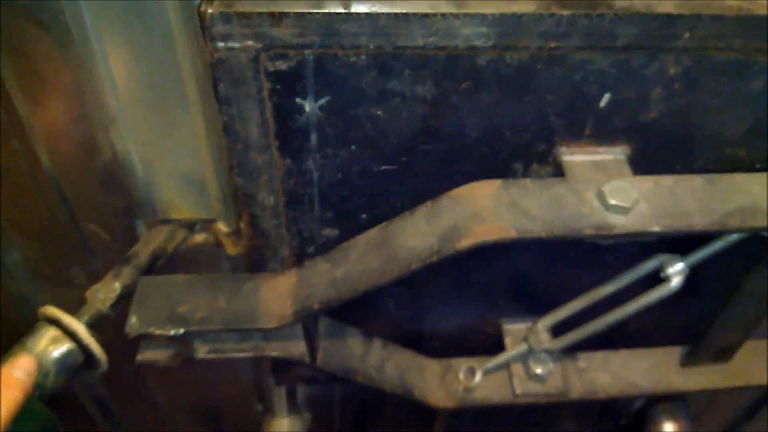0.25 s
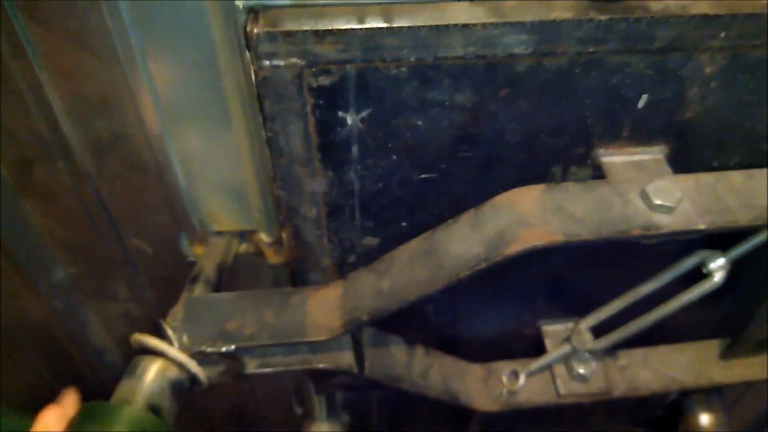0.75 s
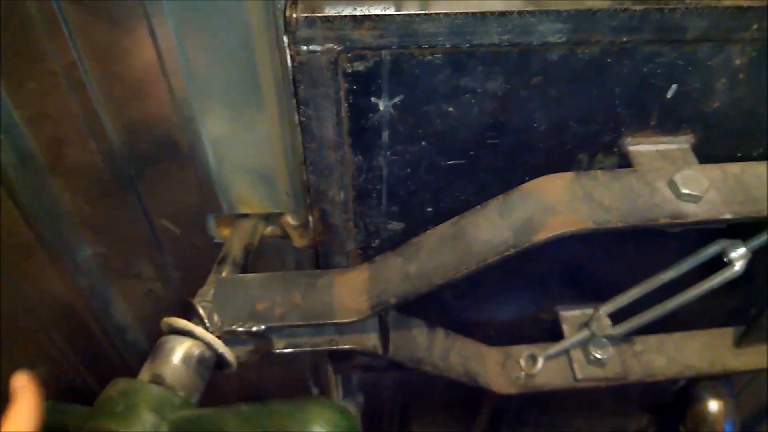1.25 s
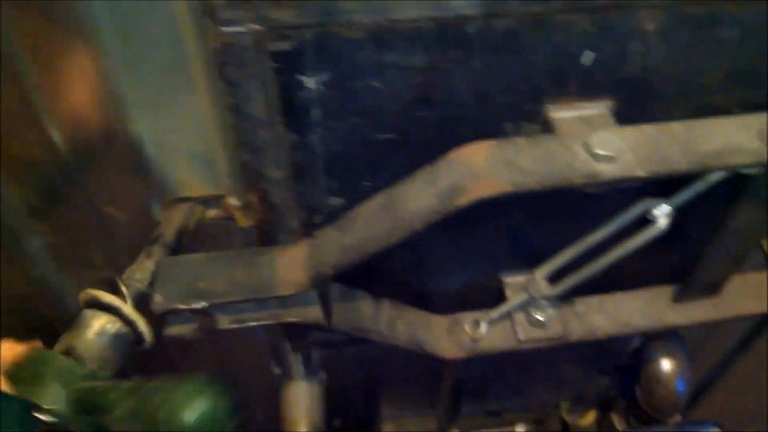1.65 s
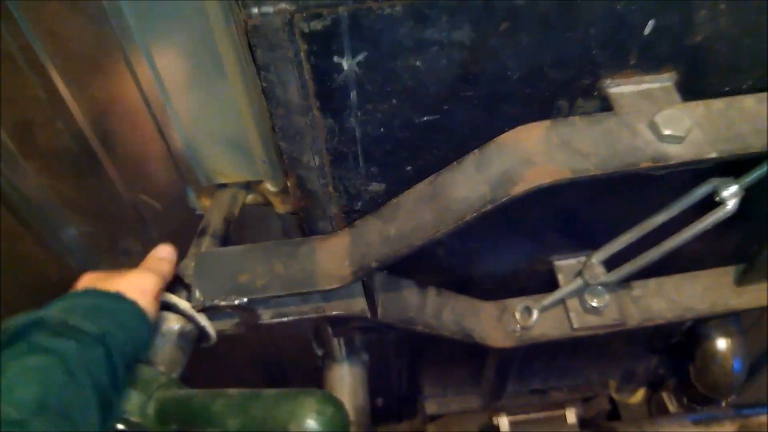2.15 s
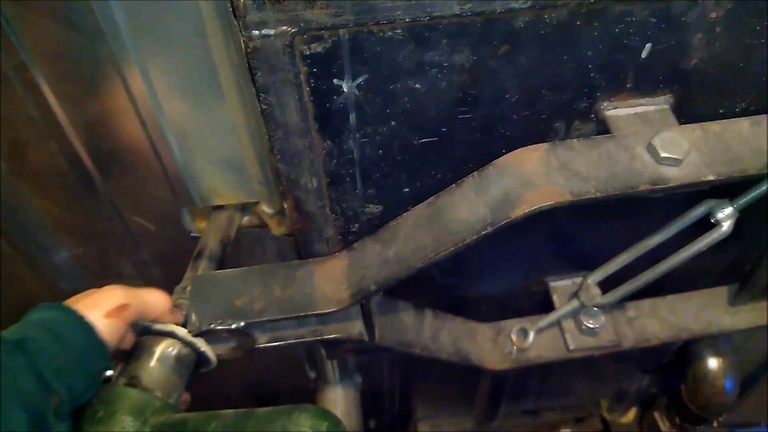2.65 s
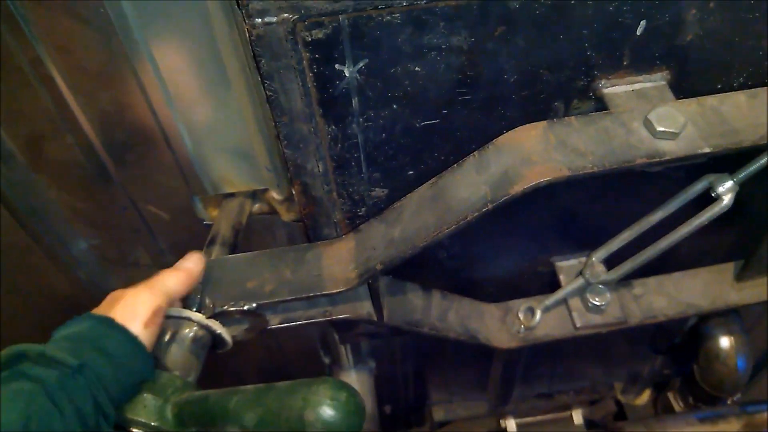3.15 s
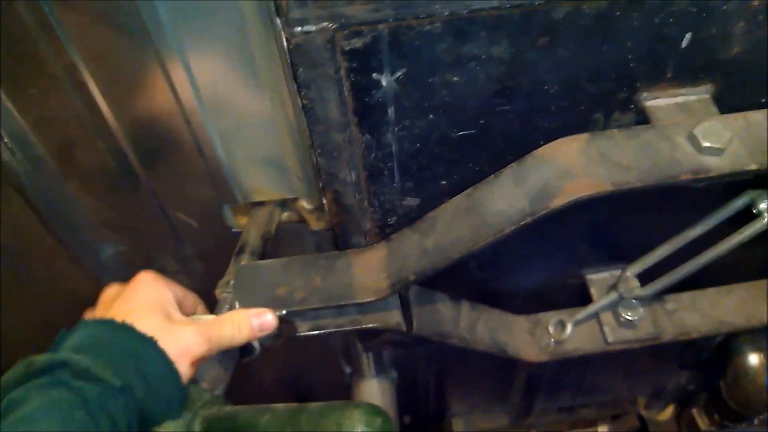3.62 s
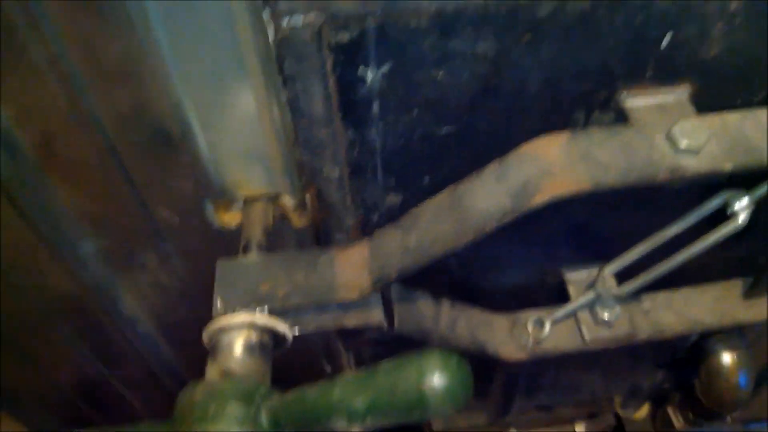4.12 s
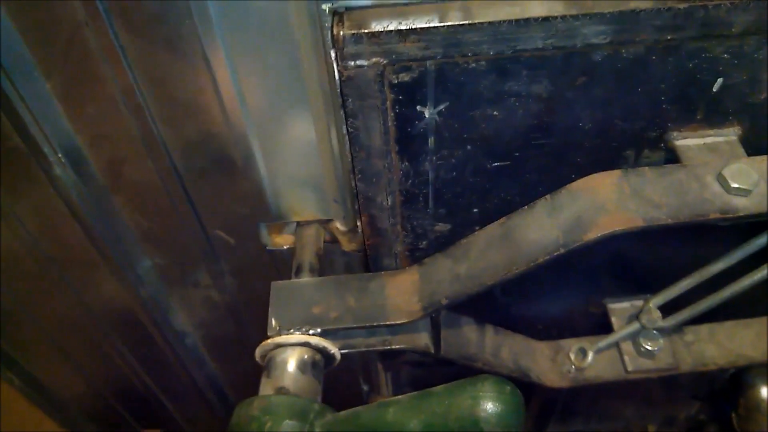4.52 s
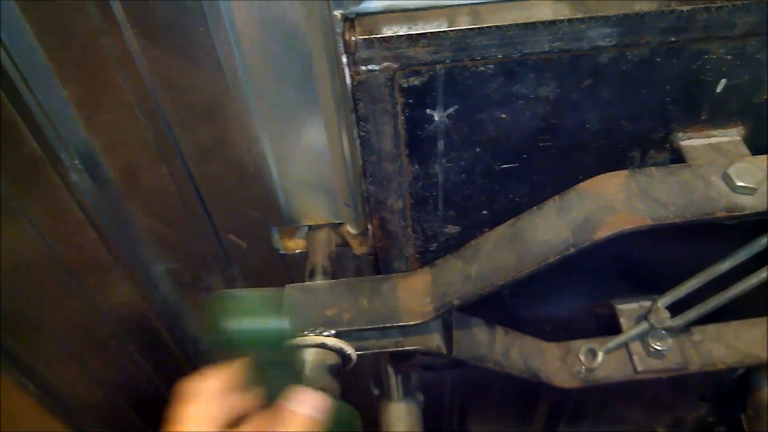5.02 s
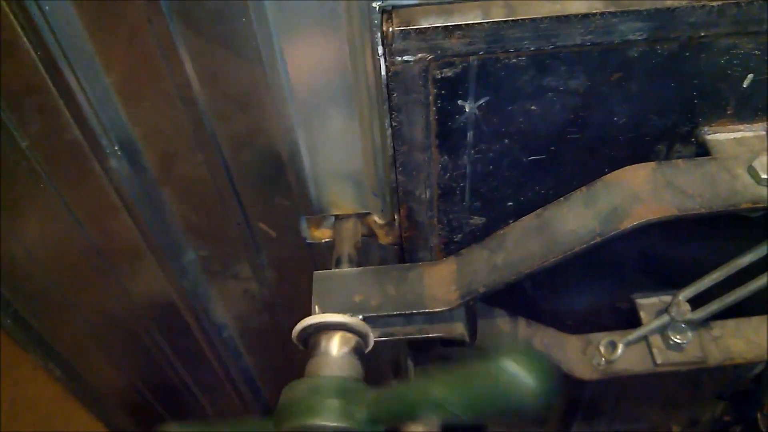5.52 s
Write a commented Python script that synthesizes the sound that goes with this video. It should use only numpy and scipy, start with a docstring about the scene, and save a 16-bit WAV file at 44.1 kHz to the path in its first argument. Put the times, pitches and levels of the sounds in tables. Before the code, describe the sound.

A heavy steel door and its latch linkage clank, scrape and rattle up close as they are shut and clamped.

```python
"""A steel door is pushed shut and its screw latch swung into the fork and tightened, close to the microphone.
Blows make the panel boom and the frame clang, and both shudder on. The linkage scrapes as it slides,
steel clicks on steel, and a loose washer and other latch parts ring when struck.
The place is a quiet workshop, heard in stereo: short reflections, a faint hum behind."""
import sys
import numpy as np
from scipy import signal
from scipy.fft import rfft, irfft
from scipy.io import wavfile
from scipy.ndimage import uniform_filter1d

SR = 44100
rng = np.random.default_rng(int(sys.argv[2]) if len(sys.argv) > 2 else 0)


def materialize(psi):
    """Save the field psi as 16-bit PCM at rate SR to the path in sys.argv[1].

    A 1-D psi becomes a single channel; in a 2-D psi each row is a channel.
    """
    bounded = np.clip(np.atleast_2d(psi).T, -1, 1)
    quanta = np.round(bounded * 32767).astype(np.int16)
    wavfile.write(sys.argv[1], SR, quanta)


N = 254589
TIME, HZ = np.arange(N) / SR, np.fft.rfftfreq(N, 1 / SR)
RING_TIME = np.arange(SR // 5) / SR

def amp(db):
    return 10 ** (np.asarray(db) / 20)

def decay(t, t60):
    return amp(-60 * t / t60)

def unit_rms(x):
    return x / np.sqrt(np.mean(x ** 2) + 1e-20)

def curve(points, hz=HZ):
    f, value = np.transpose(points)
    return np.interp(np.log(hz + 1), np.log(f + 1), value)

def add(mix, s, sound):
    part = mix[..., round(s * SR):][..., :sound.shape[-1]]
    part += sound[..., :part.shape[-1]]

def colour(x, db):
    return irfft(rfft(x) * amp(db), x.shape[-1])

def highpass(x, hz):
    return signal.sosfilt(signal.butter(2, hz, "high", fs=SR, output="sos"), x)

def convolve(x, response):
    return signal.oaconvolve(x, np.atleast_2d(response), axes=1)[:, :N]

def pan(left_db):
    gains = amp([[left_db / 2], [-left_db / 2]])
    return 2 * gains / np.linalg.norm(gains)

def ring(modes, t60_scale=1, tilt_db=0, uneven_db=0):
    """One tap: dying sines of alternate sign, tilted and uneven by where it lands."""
    hz, db, t60 = np.transpose(modes)[..., None]
    db = db + tilt_db * np.log2(hz / 1300) + uneven_db * rng.standard_normal(hz.shape)
    sines = amp(db) * decay(RING_TIME, t60 * t60_scale) * np.sin(2 * np.pi * hz * RING_TIME)
    return (-1.) ** np.arange(len(hz)) @ sines

def favoured(modes, spot_hz, db_per_octave=16):
    """Modes far from the pitch that the struck spot favours are weaker."""
    return [(hz, db - db_per_octave * abs(np.log2(hz / spot_hz)), t60) for hz, db, t60 in modes]

def slips(per_s, spread_db):
    """Two trains of tiny slips of uneven size."""
    size = amp(spread_db * np.minimum(rng.exponential(1, (2, N)), 4)) * rng.standard_normal((2, N))
    return size * (rng.random((2, N)) < per_s / SR)

def swells(starts, lengths, levels_db, rise_s, fall_t60):
    """Envelopes that rise, hold and die, summed in power."""
    grid = np.arange(0, N / SR + .004, .002)
    t = grid - starts[:, None]
    release = decay(np.maximum(t - np.reshape(lengths, (-1, 1)), 0), fall_t60)
    shapes = amp(levels_db[:, None]) * np.clip(t / rise_s, 0, 1) * release
    return np.interp(TIME, grid, np.linalg.norm(shapes, axis=0))

# Likeness of the microphone's two sides: f/Hz, correlation
LIKENESS = [(60, 0.89), (180, 0.99), (550, 0.79), (1200, 0.24), (5000, -0.25), (15000, 0.28)]
# Their balance: f/Hz, left over right/dB
BALANCE = [(60, 0.6), (500, -0.1), (1500, 3.5), (4000, 3.5), (9000, -8.5), (15000, -4.5)]
def stereo(pair):
    """The two sides hear partly the same sound, leaning left or right by pitch."""
    left, unlike = rfft(pair)
    same = curve(LIKENESS)
    right = same * left + np.sqrt(1 - same ** 2) * unlike
    return irfft(np.array([left, right]) * amp(np.outer([.5, -.5], curve(BALANCE))), N)

# Workshop air: f/Hz, relative level/dB
AIR = [(59, -24), (100, -3.5), (1380, -22.5), (2150, -18.5), (3520, -40), (3830, -27), (10200, -25),
       (15300, -52), (16300, -26)]
def hum():
    """Steady air far behind, with the microphone's hiss."""
    return amp(-62) * unit_rms(stereo(colour(rng.standard_normal((2, N)), curve(AIR))))

# Course of the rumble: t/s, level/dB
RUMBLE = [(0.0, -47.5), (0.06, -54), (0.39, -61.5), (0.51, -55), (0.63, -56), (1.64, -59.5), (1.89, -57),
          (2.28, -58), (2.71, -64), (2.92, -64), (3.66, -56), (3.76, -44), (3.92, -62), (4.02, -38.5),
          (4.36, -62.5), (4.93, -52.5), (5.0, -58), (5.77, -53.5)]
# Its spectrum: f/Hz, relative level/dB
RUMBLE_TONE = [(20, -39), (35, -11.5), (55, -1), (78, 5.5), (100, 2), (130, -28.5)]
def rumble():
    """Low noise swells up to the microphone through floor and hand."""
    noise = colour(rng.standard_normal((2, N)), curve(RUMBLE_TONE))
    return amp(np.interp(TIME, *np.transpose(RUMBLE))) * unit_rms(stereo(noise))

def room(x):
    """The workshop walls return sparse, dulled reflections after 4 ms."""
    t = np.arange(SR // 2) / SR
    echoes = rng.choice([-1., 1.], (2, len(t))) * (rng.random((2, len(t))) < .05) * (t > .004)
    tail = signal.lfilter([1], [1, -.5], echoes * decay(t, t60=.18))
    return convolve(x, tail / np.linalg.norm(tail[0]))

# Linkage strokes: t/s, length/s, scrape level/dB, panel level/dB, frame level/dB
STROKES = [(0, 0.11, -62.5, -60.5, -75), (0.225, 0.36, -91, -67, -77), (0.5, 0.025, -35, -34, -46),
           (0.703, 0.15, -45, -64, -45.5), (0.896, 0.18, -54.5, -49, -58),
           (1.17, 0.41, -65.5, -68.5, -71.5), (1.51, 0.38, -79, -49.5, -63.5),
           (1.81, 0.018, -24.5, -22.5, -54), (1.885, 0.2, -46.5, -53.5, -43.5),
           (2.095, 0.21, -54.5, -49, -52), (2.378, 0.19, -52, -48, -49),
           (2.599, 0.053, -43.5, -46.5, -42.5), (2.673, 0.16, -57.5, -48, -51.5),
           (3.038, 0.38, -92, -55.5, -77), (3.636, 0.19, -68.5, -52, -66), (3.742, 0.068, -50, -61, -61),
           (3.91, 0.083, -42, -45.5, -44), (3.99, 0.21, -44, -58.5, -48), (4.358, 0.25, -85, -80, -78),
           (4.6, 0.41, -73.5, -62, -70), (4.94, 0.11, -62.5, -49.5, -58), (5.09, 0.028, -59, -43, -58),
           (5.453, 0.21, -55, -52.5, -58), (5.55, .2, -78, -67, -82)]
def sliding(part):
    """How hard the moving linkage drives one part."""
    starts, lengths, *levels = np.transpose(STROKES)
    db = levels[["scrape", "panel", "frame"].index(part)]
    return swells(starts, lengths, db, rise_s=.031, fall_t60=.3)

# Steel rubbing on steel: f/Hz, relative level/dB
GRIT = [(120, -72), (500, -18.5), (1180, -20), (2000, 1), (2160, -8), (2970, -4.5), (3210, -1.5),
        (6720, -3.5), (10200, -3), (12400, -10.5), (14400, -17.5), (16300, -28.5)]
def scrape():
    """Dense grit under the sliding linkage."""
    grit = colour(slips(per_s=2500, spread_db=2.5), curve(GRIT))
    return sliding("scrape") * unit_rms(stereo(grit))

# Dry steel contacts: t/s, level/dB, tilt/(dB per octave), t60/s
CLICKS = [(0.094, -51.5, 7, 0.058), (0.134, -50, 15, 0.035), (.248, -55, 11, 0.057), (0.451, -49, 1, 0.033),
          (0.4906, -30.5, 2, 0.038), (0.4968, -23, 7, 0.031), (0.4991, -19.5, -8.5, 0.042),
          (0.5152, -31, -11, 0.04), (0.529, -22.5, 4.5, 0.051), (0.5463, -34.5, -8, 0.092),
          (0.708, -32, 6, 0.086), (0.735, -35.5, 11, 0.14), (0.7823, -30, -6, 0.038),
          (0.795, -22.5, 5, 0.027), (0.8005, -21.5, -14, 0.0069), (0.87, -27, 1, 0.024),
          (0.992, -44.5, 14, 0.14), (1.0504, -46.5, 15, 0.059), (1.074, -38.5, 0.5, 0.043),
          (1.239, -54.5, 7.5, 0.12), (1.26, -40.5, 11, 0.054), (1.4408, -33, 3, 0.014),
          (1.507, -43.5, 6, 0.021), (1.586, -50.5, 9, 0.054), (1.7392, -46, -8, 0.033),
          (1.787, -49, 3, 0.036), (1.8052, -33.5, -16, 0.058), (1.8207, -36, -4, 0.055),
          (1.8327, -18.5, 3, 0.079), (1.8434, -21.5, 8, 0.033), (1.8621, -25, -12, 0.04),
          (1.878, -21.5, 3.5, 0.054), (1.9602, -38.5, -1, 0.066), (1.9962, -28.5, -6, 0.02),
          (2.0621, -28, 2, 0.022), (2.201, -43, -4, 0.036), (2.272, -34.5, -5.5, 0.017),
          (2.28, -36, -2, 0.029), (2.2948, -34.5, -3, 0.019), (2.3416, -35, -7, 0.028),
          (2.35, -30.5, 1, .03), (2.384, -46, 19, .02), (2.4135, -26, 1.5, 0.022), (2.485, -36, -12, 0.039),
          (2.501, -24, 5, 0.018), (2.562, -35, 1, 0.026), (2.599, -37.5, -3, 0.14),
          (2.6733, -28.5, 12, 0.073), (2.6781, -28.5, -10, 0.031), (2.709, -26, -13, 0.017),
          (2.788, -46.5, 8, 0.041), (2.824, -42.5, -7.5, 0.029), (2.8585, -46, 12, 0.09),
          (3.8834, -16.5, 4, 0.014), (4, -36, 2, 0.059), (4.035, -31.5, -1, 0.04),
          (4.05, -32.5, -0.5, 0.032), (4.086, -21.5, 11.5, 0.015), (4.113, -24, 10.5, 0.058),
          (4.205, -28, 3, 0.024), (4.2905, -32, -21.5, 0.013), (4.299, -44.5, -7, 0.034),
          (4.392, -43, 23, 0.021), (4.4518, -54.5, 11, .03), (4.5344, -43.5, 14, 0.041),
          (4.568, -39.5, 21, 0.042), (4.981, -45.5, 3, 0.041), (4.994, -47.5, 7, 0.036),
          (5.129, -32, -0.5, 0.04), (5.141, -29.5, 13.5, 0.05), (5.4673, -38, 13.5, 0.058)]
def clicks():
    """Noise bursts with chance resonances, each opened by a crack; brighter ones lie further right."""
    out, t, hz = np.zeros((2, N)), np.arange(8192) / SR, np.fft.rfftfreq(8192, 1 / SR)
    crack_time = t - .0011
    crack = amp(-2) * decay(crack_time, t60=.013) * np.clip(crack_time / .0026, 0, 1)
    for s, db, tilt_db, t60 in CLICKS:
        lumps = unit_rms(uniform_filter1d(uniform_filter1d(rng.standard_normal(len(hz)), 60), 60))
        tone_db = curve(GRIT, hz) + tilt_db * np.log2(hz / 7000 + .11) + 3.5 * np.clip(lumps, -2, 1.5)
        burst = unit_rms(colour(rng.standard_normal((2, len(t))), tone_db))
        body = decay(t, t60) * np.minimum(t / .0048, 1)
        add(out, s, amp(db) * pan(-6 - .54 * tilt_db) * burst * (body + crack))
    return out

def clinks(hits, modes, t60_scale, left_db):
    """A tapped part rings freely until the next contact catches it."""
    out = np.zeros((2, N))
    for s, db, free_s, *spot_hz in hits:
        struck = favoured(modes, *spot_hz, db_per_octave=17) if spot_hz else modes
        envelope = np.minimum(RING_TIME / .00025, 1) * decay(np.maximum(RING_TIME - free_s, 0), t60=.02)
        sound = ring(struck, t60_scale, uneven_db=2.5) * envelope
        late = np.roll(sound, rng.integers(1, 6))  # reaches the left side a little later
        add(out, s, amp(db) * pan(left_db) * np.array([late, sound]) / abs(sound).max())
    return out

# Taps on each part: t/s, level/dB, free ringing/s, favoured f/Hz
WASHER_HITS = [(.494, -12, 0.0052, 10400), (.497, -17.5, 0.0073, 10400), (.5, -8.5, 0.0025, 10400),
               (.506, -25, 0.003, 10400), (.522, -39, 0.057, 10800), (.59, -58, 0.035, 10800),
               (.87, -26, 0.0046, 10500), (2.061, -22.5, 0.055, 9850), (2.083, -20.5, 0.01, 10100),
               (2.1, -25.5, 0.034, 10200), (2.195, -40.5, 0.033, 8300), (2.24, -42.5, 0.047, 10300),
               (2.27, -24.5, 0.0031, 10300), (2.282, -27.5, 0.013, 10300), (2.296, -31.5, 0.038, 9600),
               (2.343, -30, 0.0054, 10600), (2.352, -33.5, 0.0093, 10600), (2.415, -24.5, 0.0037, 9100),
               (2.486, -25.5, 0.0072, 8200), (2.503, -31, 0.074, 8500), (2.565, -35, 0.021, 10600),
               (2.598, -25.5, 0.054, 9300), (2.71, -35.5, 0.029, 10200), (5.136, -32, 0.025, 10520)]
PIN_HITS = [(.001, -35, 0.11, 10000), (1.443, -25, 0.05, 7300), (1.51, -39.5, 0.034, 7500)]
BAR_HITS = [(.864, -29, 0.11, 1580), (2.338, -39, 0.098, 1740), (2.41, -41.5, 0.096, 1750),
            (2.49, -46, 0.041, 1740), (2.595, -38, 0.07, 1830), (2.671, -24, 0.05, 1480),
            (2.704, -23.5, 0.019, 1480), (2.855, -40.5, 0.075, 1430), (4.2, -39, 0.027, 1960)]
# Their modes: f/Hz, level/dB, unscaled t60/s
WASHER_MODES = [(3990, 1, .08), (5240, -5, .05), (7456, -18, .06), (8113, -8, .07), (10390, 0, .14),
                (10450, -11, .12), (14540, -10, .11)]
PIN_MODES = [(4800, 2, .025), (6420, -7, .03), (6705, 3, .035), (7905, -4, .11), (9200, -8, .08),
             (9520, 0, .1), (12940, 2, .055), (14950, -6, .04)]
BAR_MODES = [(414, 3, .25), (891, 0, .17), (1300, -9, .09), (1744, 0, .16), (2045, -5, .09),
             (2299, -1, .15), (2690, -5, .07)]
def latch_clinks():
    """The loose washer and the pin ring high on the right, the bar lower near the centre."""
    return (clinks(WASHER_HITS, WASHER_MODES, t60_scale=1.6, left_db=-20)
            + clinks(PIN_HITS, PIN_MODES, t60_scale=1, left_db=-12)
            + clinks(BAR_HITS, BAR_MODES, t60_scale=.95, left_db=1.5))

# Taps on each part: t/s, level/dB, free ringing/s
LINK_HITS = [(.797, -20.5, .007), (2.344, -27, .007), (2.352, -31, .01), (2.415, -50, .005),
             (2.503, -29.5, 0.0046), (2.612, -30, .02), (2.709, -21, 0.01)]
FORK_HITS = [(2.676, -16.5, 0.006), (2.682, -17, 0.003), (2.709, -22, 0.0096), (2.862, -39.5, 0.022),
             (5.475, -63, 0.14)]
HANDLE_HITS = [(4.088, -42, .015), (4.115, -11, 0.11), (4.57, -50, 0.079), (4.99, -49, .02)]
HUB_HITS = [(4.028, -30.5, .03), (4.972, -35, .1), (5.119, -33.5, 0.013), (5.137, -31, .1)]
# Their modes: f/Hz, level/dB, unscaled t60/s
LINK_MODES = [(4920, -6, .02), (5320, 0, .025), (5850, -6, .02), (7350, -7, .02)]
FORK_MODES = [(8700, -1, .035), (9877, 0, .045)]
HANDLE_MODES = [(6072, -19, .07), (8120, -14, .14), (10410, -12, .1), (11625, 0, .055), (12280, -8, .08),
                (13490, -9, .09), (14540, -15, .08)]
HUB_MODES = [(754, -3, .13), (829, 0, .08), (895, -3, .1), (1030, -6, .1), (1734, -7, .09), (2013, -1, .06)]
def fastening_clinks():
    """A link snaps over, fork and screw handle ring on the right; the hub knocks near the centre."""
    return (clinks(LINK_HITS, LINK_MODES, t60_scale=.95, left_db=-9)
            + clinks(FORK_HITS, FORK_MODES, t60_scale=.8, left_db=-17)
            + clinks(HANDLE_HITS, HANDLE_MODES, t60_scale=.95, left_db=-12)
            + clinks(HUB_HITS, HUB_MODES, t60_scale=.95, left_db=1.5))

# Modes of the door: f/Hz, level/dB, unscaled t60/s
PANEL_MODES = [(132, 4.5, 0.17), (158.7, -2.5, 0.48), (194.4, 0, 0.26), (230.4, -4, 0.2),
               (252.2, -2.5, 0.22), (302.8, -0.5, 0.16), (349.8, -5, 0.14), (380.2, -7, 0.15),
               (417.3, 0, 0.053), (543, -2, 0.028)]
FRAME_MODES = [(586, -5.5, 0.056), (733.4, 0, 0.093), (762, 2, 0.081), (843, 2, 0.044), (1121, 3.5, 0.024),
               (1333, -1.5, 0.039), (1516, -4, 0.052), (1672, 0.5, 0.017), (2067, -1, 0.024),
               (2317, -5.5, 0.036), (2710, -3.5, 0.012), (3270, -24.5, 0.11)]
def shudder(starts, frame_db, panel_db, swell_s=.0047):
    """Slips keep panel, frame and loose bar trembling after blows and while the linkage slides."""
    panel_ring = ring(PANEL_MODES, t60_scale=.9)
    bar_ring = amp(-15) * ring(favoured(BAR_MODES, 1400), t60_scale=.36)
    frame_ring = ring(FRAME_MODES, t60_scale=.23) + bar_ring
    panel = unit_rms(convolve(slips(per_s=900, spread_db=1.24), panel_ring))
    frame = unit_rms(convolve(slips(per_s=1500, spread_db=1.8), frame_ring))
    panel *= np.hypot(sliding("panel"), swells(starts, swell_s, panel_db - 9.5, swell_s, fall_t60=.67))
    frame *= np.hypot(sliding("frame"), swells(starts, swell_s, frame_db - 20, swell_s, fall_t60=.39))
    return panel + frame

# Blows on the door: t/s, frame level/dB, panel level/dB, frame tilt/(dB per octave), favoured panel f/Hz
BLOWS = [(0.397, -51, -45.5, 5, 191), (0.4843, -14.5, -25, 9.5, 370), (.503, -24.5, -24.5, -7, 175),
         (0.497, -16, -22, -7, 337), (0.531, -20, -27, 22, 165), (.548, -36, -25.5, 0, 250),
         (.566, -37, -27.5, -5, 235), (0.58, -39, -48, -7, 158), (0.699, -37, -46, 22, 200),
         (0.733, -28.5, -24.5, -13, 392), (0.777, -27.5, -25, -14, 245), (.783, -30, -49.5, 24, 200),
         (.792, -27.5, -46, 16, 200), (0.848, -32, -32, -34, 306), (0.871, -31.5, -48.5, -1, 200),
         (.99, -35, -38.5, -17, 248), (1.053, -27.5, -31.5, 0, 296), (1.078, -37.5, -35.5, -10, 202),
         (1.559, -44.5, -44, 0, 201), (1.735, -31.5, -35, 5.5, 198), (1.797, -29, -33.5, -1, 201),
         (1.821, -15.5, -22.5, 5, 370), (1.832, -38, -22, -9, 214), (1.84, -27, -18.5, 0, 211),
         (1.857, -28, -20.5, -2, 289), (1.873, -32, -18.5, 2, 216), (1.897, -26, -20.5, 5, 207),
         (1.92, -33, -30, 4, 393), (1.924, -36, -25.5, 0, 132), (1.989, -35, -29, -9, 200),
         (2.025, -50, -30, 0, 151), (2.336, -32.5, -47, 5, 200), (2.452, -37.5, -32.5, -1, 155),
         (2.596, -29, -70, 6, 200), (2.668, -20, -37.5, 12, 400), (2.702, -33.5, -41.5, 10, 406),
         (2.851, -35, -47.5, 12, 300), (3.186, -60, -43.5, -2, 208), (3.463, -51, -45, -17.5, 271),
         (3.749, -42, -37, 14, 183), (3.765, -35.5, -49, 14, 186), (3.818, -33, -45.5, 4.5, 199),
         (3.877, -22.5, -33.5, 7, 354), (3.895, -25, -45, 6, 300), (3.945, -32, -30.5, 2, 260),
         (4.008, -20, -20.5, -6, 340), (4.019, -47, -36, -7, 143), (4.03, -28.5, -32, -10, 367),
         (4.048, -30, -29, 6, 270), (4.2, -30, -68, 10.5, 200), (4.2897, -34.5, -69, 2, 247),
         (4.974, -36, -34, -9, 230), (5.121, -29, -30.5, 3, 224), (5.137, -36, -61, 2, 202),
         (5.458, -41.5, -73, 21, 200), (5.54, -42, -42.5, -8, 199), (5.559, -36, -35.5, 9.5, 203),
         (5.585, -41, -40.5, -6, 252), (5.729, -45, -41.5, -11, 197)]
def door():
    """Close up, each blow clangs the frame, booms the panel and makes the whole door lurch."""
    steel, thumps = shudder(*np.transpose(BLOWS)[:3]), np.zeros(N)
    lurch = amp(-10) * np.sin(2 * np.pi * 51.6 * RING_TIME) * decay(RING_TIME, t60=.08)
    for s, frame_db, panel_db, tilt_db, spot_hz in BLOWS:
        contact = rng.standard_normal((2, 900)) * np.exp(-np.arange(900) / 147)  # some ms of rough touch
        clang = convolve(contact, ring(FRAME_MODES, tilt_db=tilt_db, uneven_db=-.5))
        clang = clang[:, :len(RING_TIME)] * decay(RING_TIME, t60=.12)
        boom = ring(favoured(PANEL_MODES, spot_hz), t60_scale=.94)
        add(steel, s, amp(frame_db) * clang / abs(clang).max(1)[:, None])
        add(steel, s, amp(panel_db) * boom / abs(boom).max())
        add(thumps, s, amp(panel_db) * lurch)
    steel = highpass(steel, hz=99.2)  # trims the bass below the panel's lowest boom
    echoes = room(highpass(steel, hz=350))  # only mids and highs echo, so the boom stays dry
    return stereo(steel + amp(-7.5) * echoes) + thumps

def scene():
    """All that reaches the microphone; the ringing parts lie close by and carry little room."""
    contacts, ringing = clicks(), latch_clinks() + fastening_clinks()
    echoes = room(amp(-5) * contacts + amp(-13.5) * ringing)
    return door() + contacts + ringing + echoes + scrape() + hum() + rumble()

def record(dry):
    """The deepest bass is cut, the loudest peaks are softly rounded and the treble ends at 16 kHz."""
    rounded = .9 * np.tanh(highpass(dry, hz=42) / .9)
    band_limit = signal.firwin(511, 16000, window=("kaiser", 9), fs=SR)
    return signal.oaconvolve(rounded, band_limit[None], "same", axes=1)

dry = scene()
out = record(dry)
materialize(out)
```